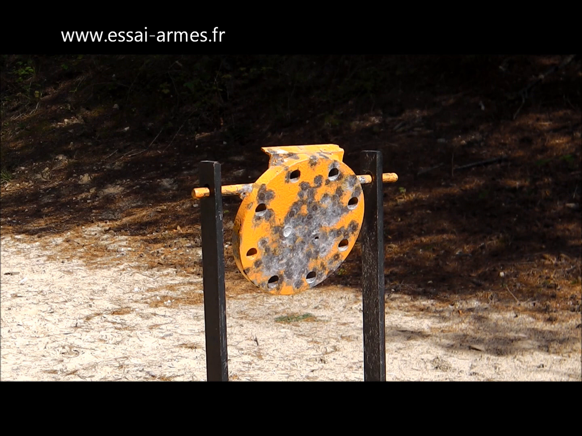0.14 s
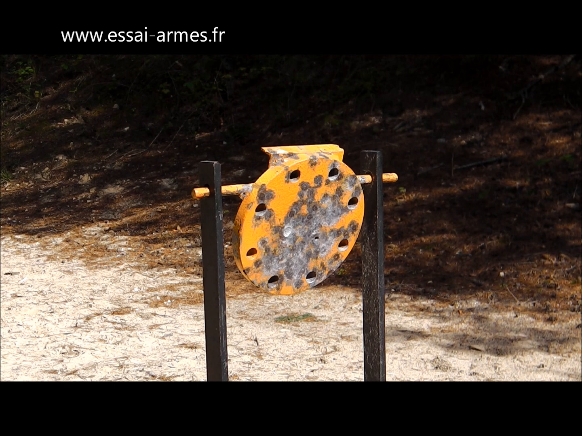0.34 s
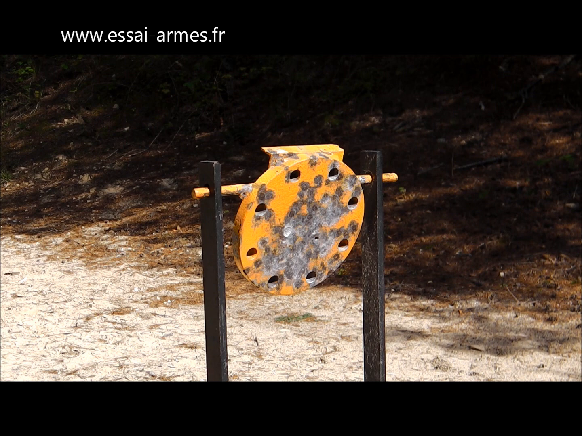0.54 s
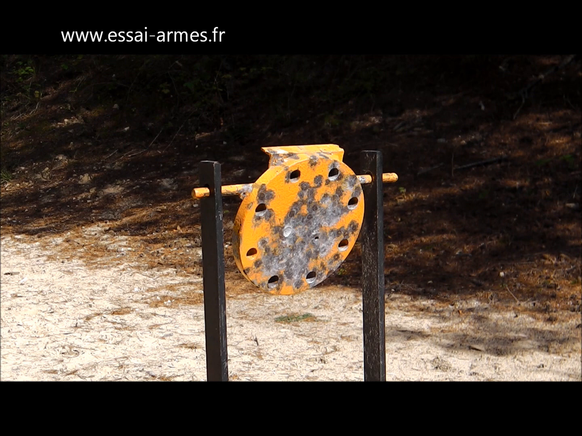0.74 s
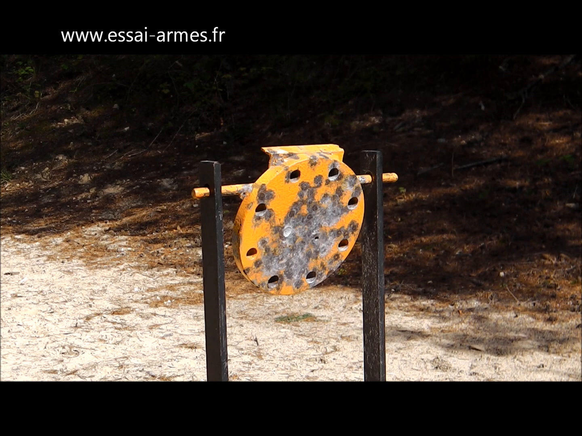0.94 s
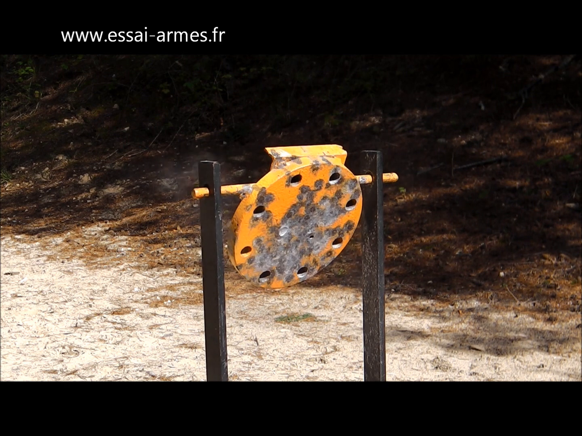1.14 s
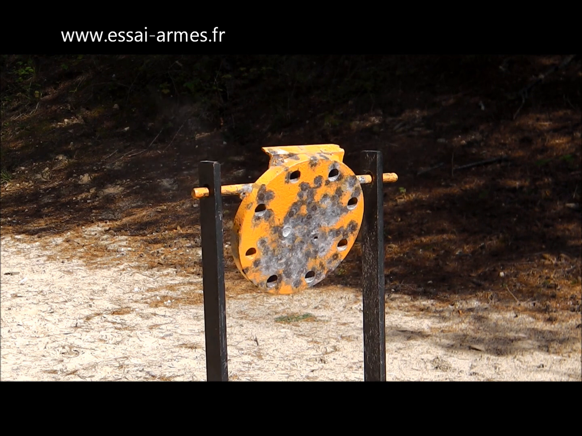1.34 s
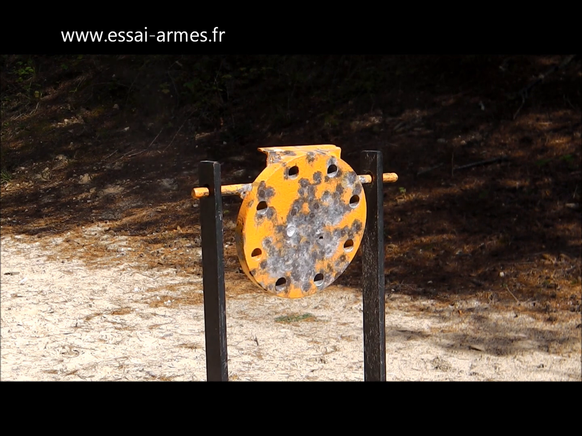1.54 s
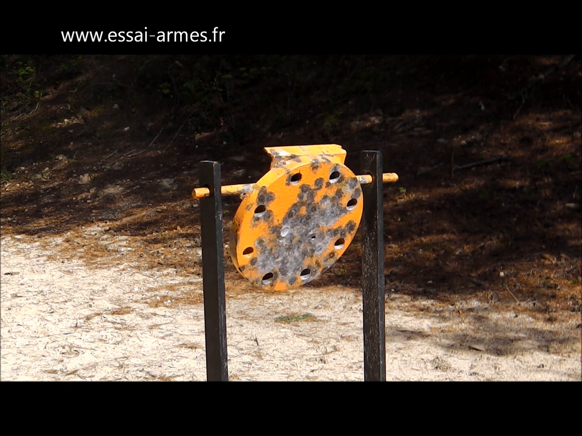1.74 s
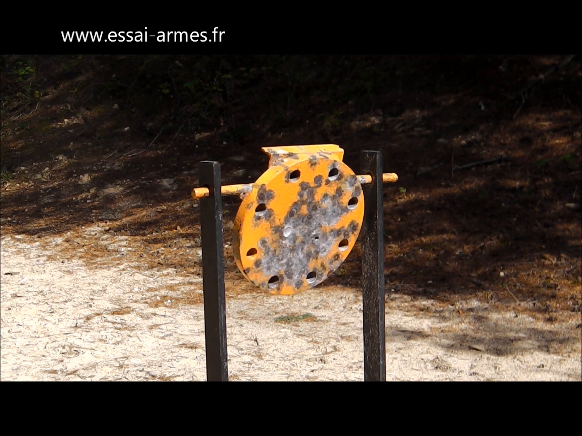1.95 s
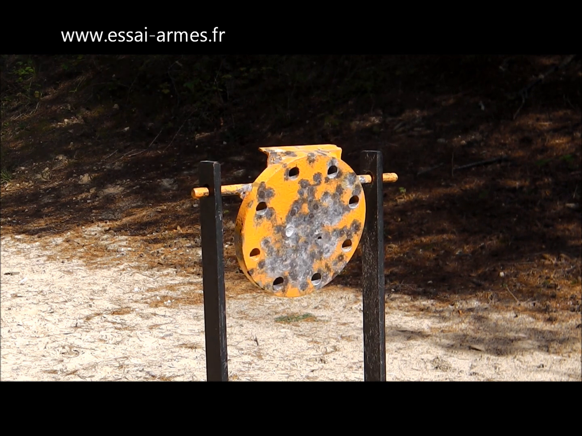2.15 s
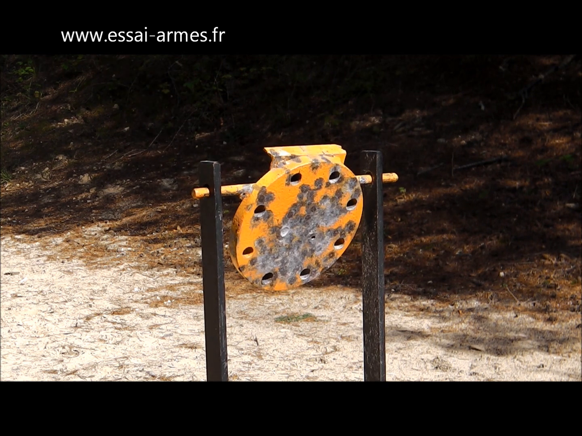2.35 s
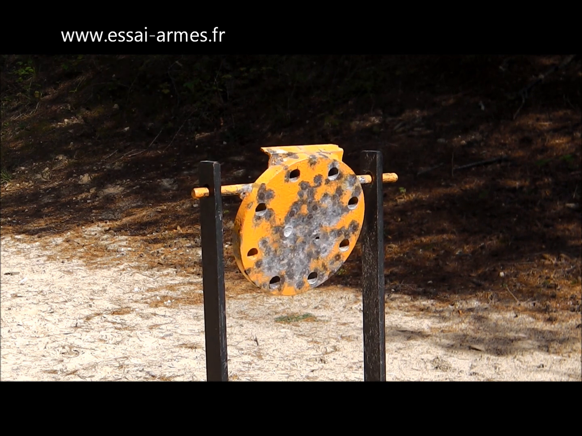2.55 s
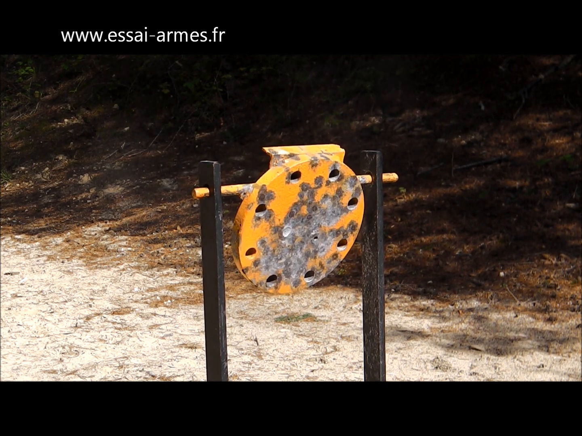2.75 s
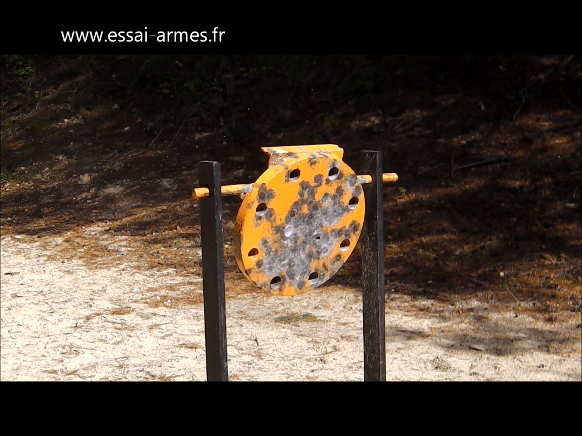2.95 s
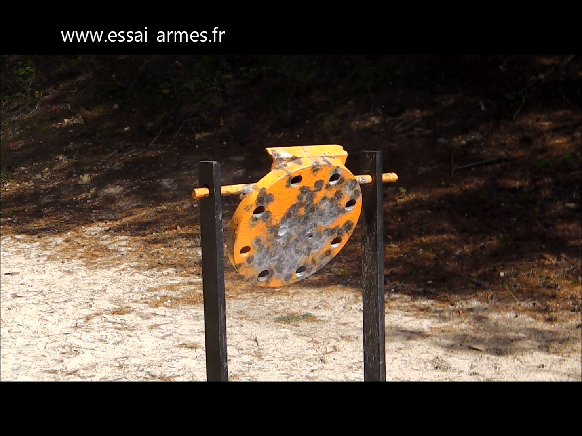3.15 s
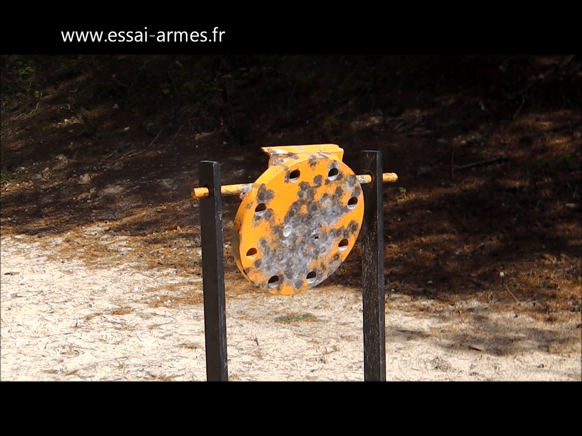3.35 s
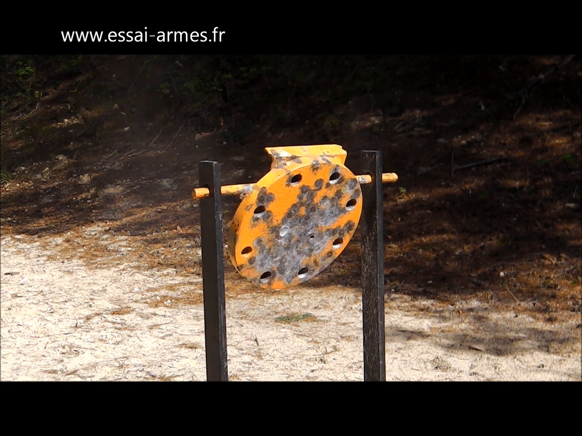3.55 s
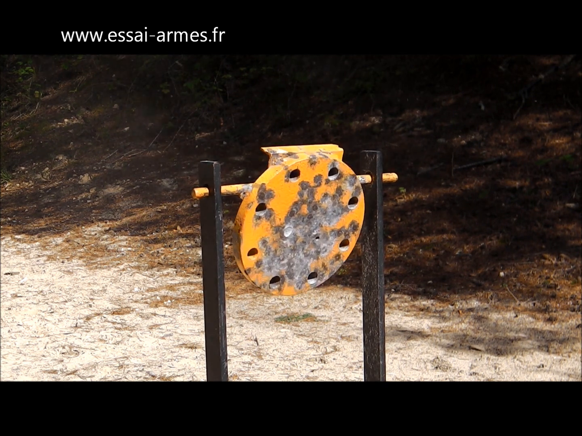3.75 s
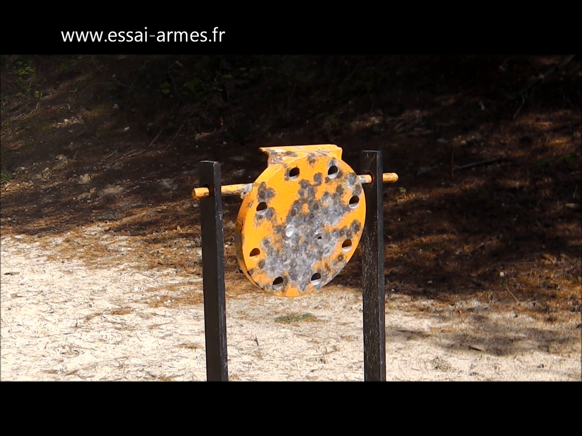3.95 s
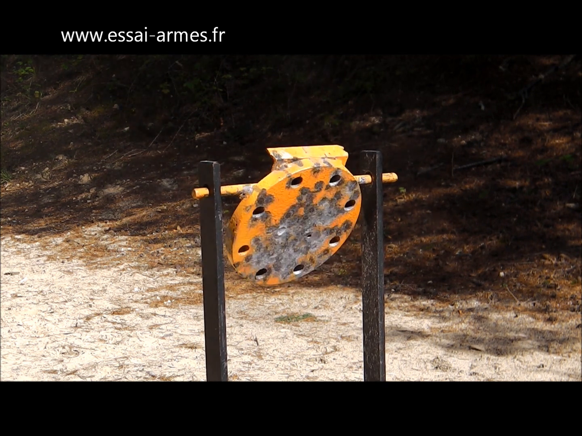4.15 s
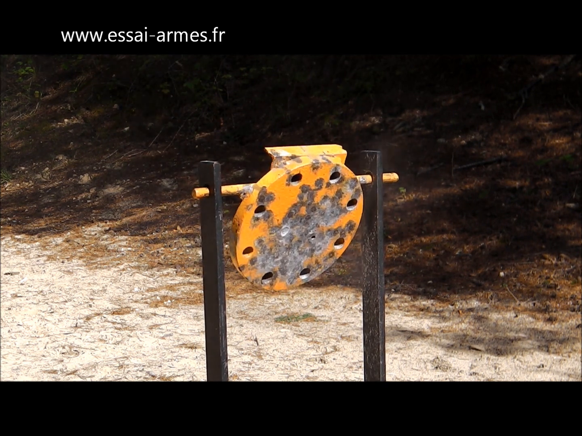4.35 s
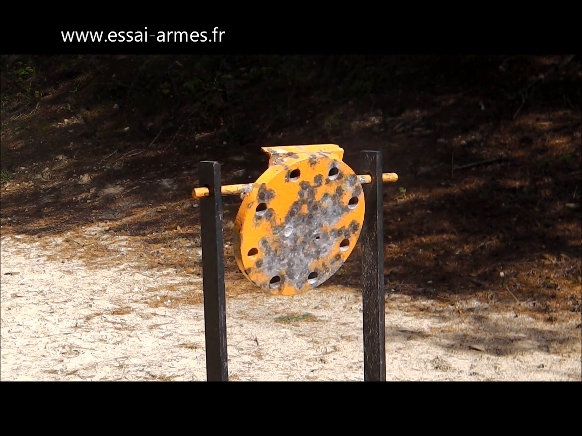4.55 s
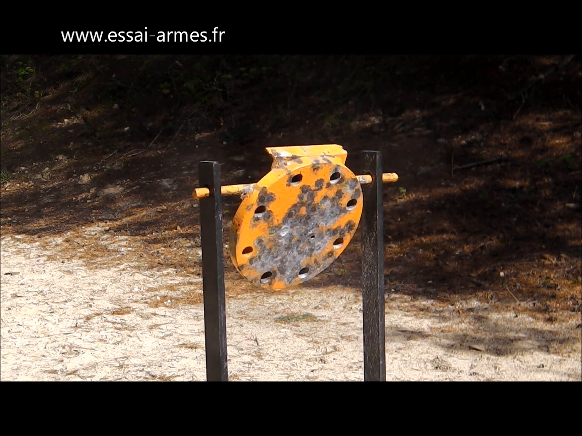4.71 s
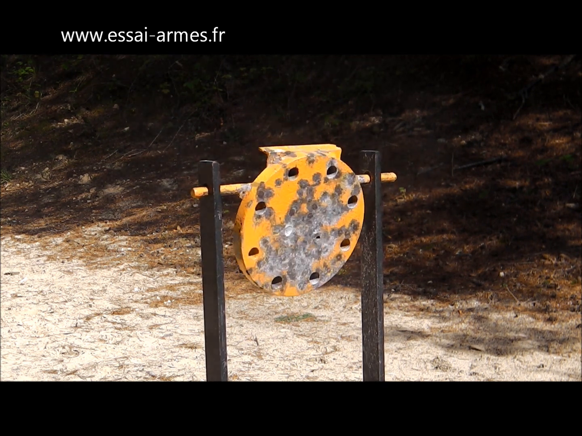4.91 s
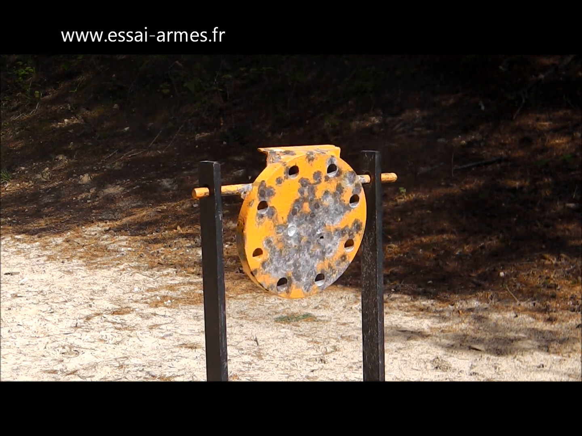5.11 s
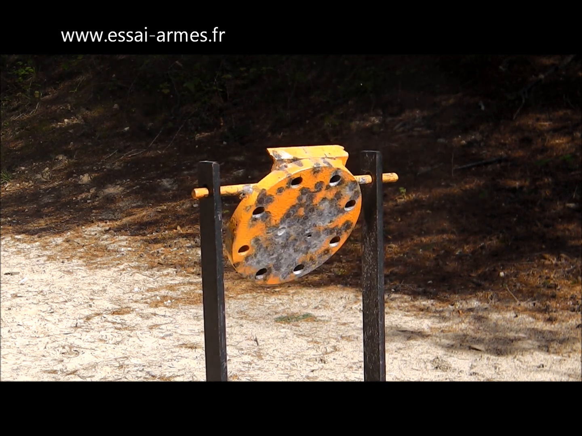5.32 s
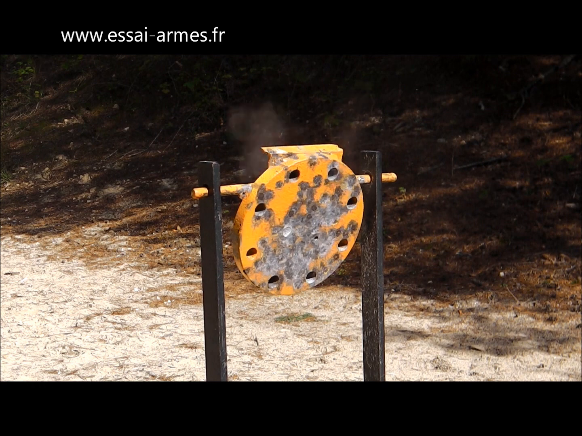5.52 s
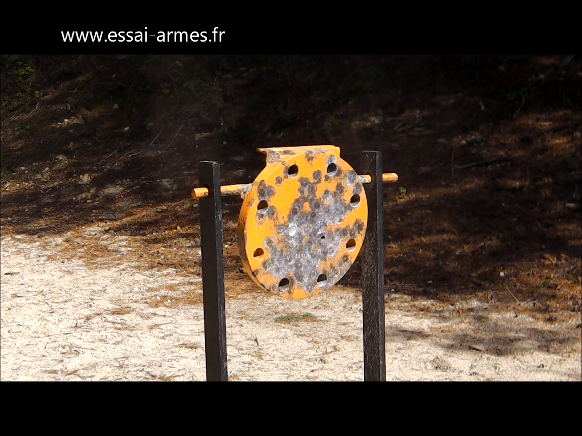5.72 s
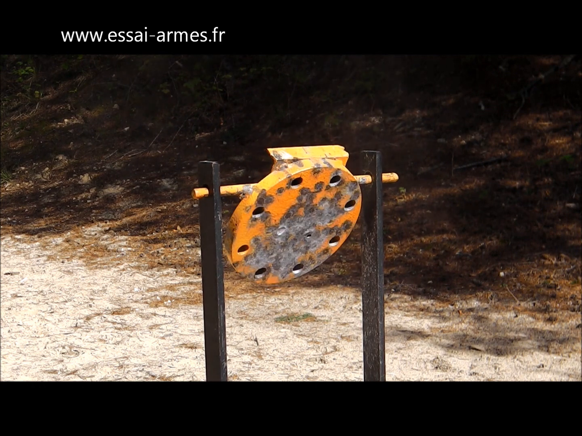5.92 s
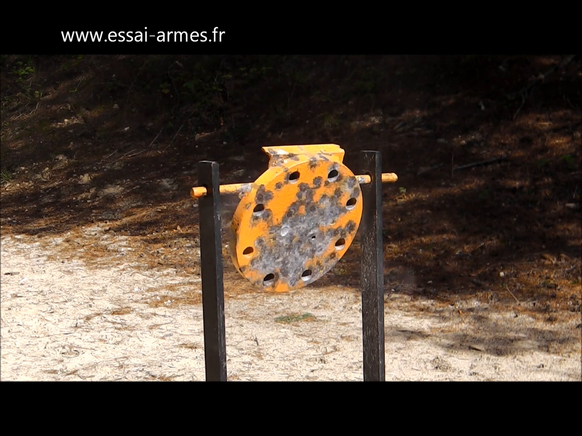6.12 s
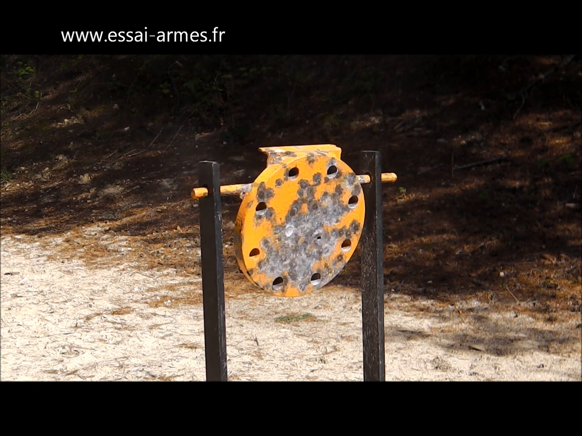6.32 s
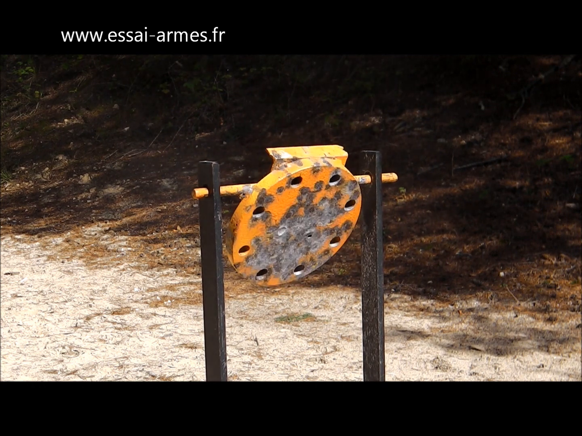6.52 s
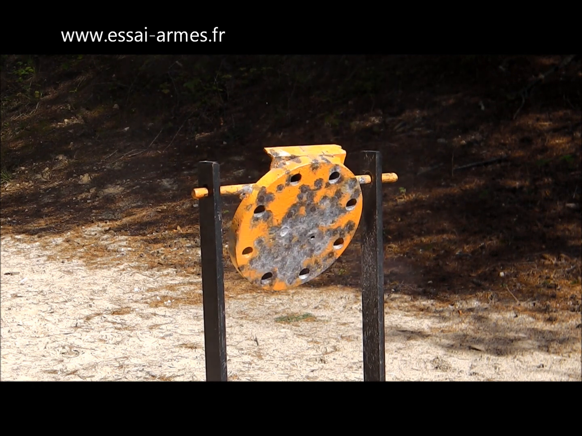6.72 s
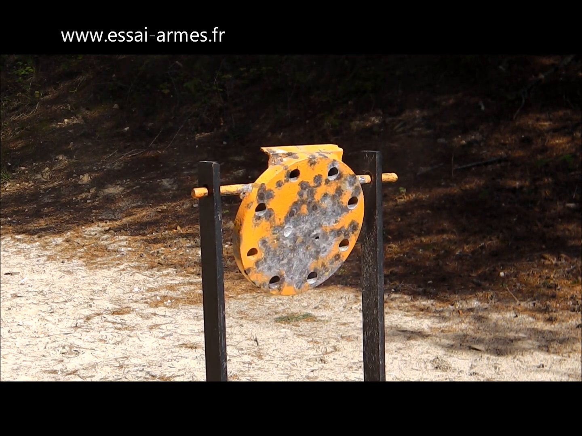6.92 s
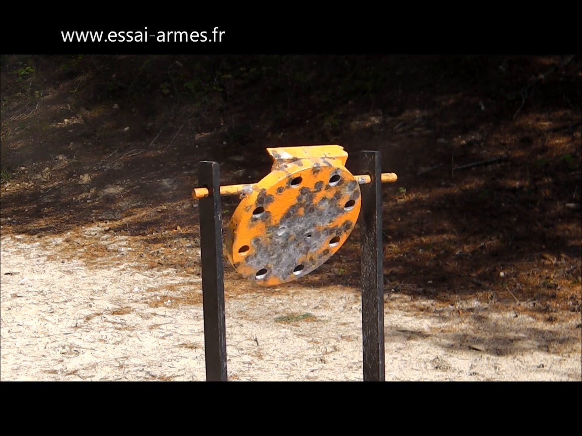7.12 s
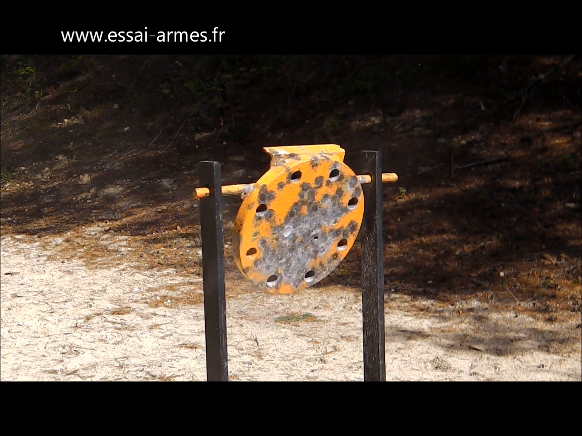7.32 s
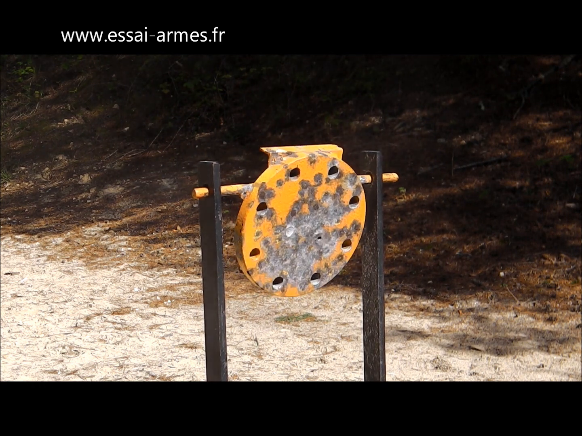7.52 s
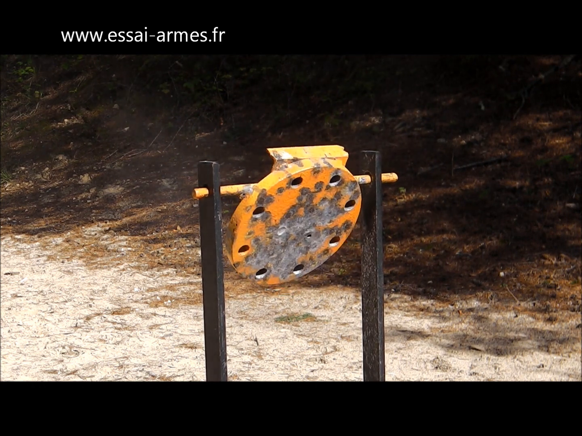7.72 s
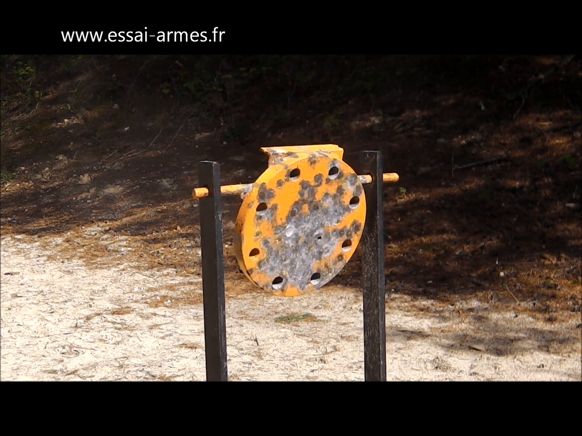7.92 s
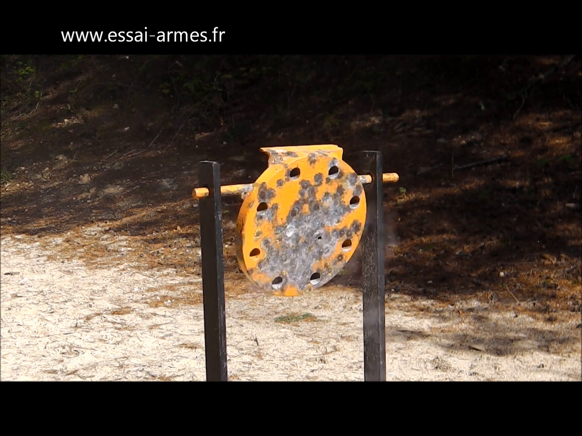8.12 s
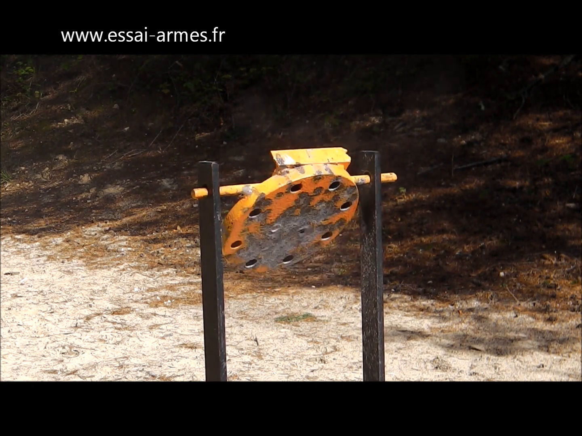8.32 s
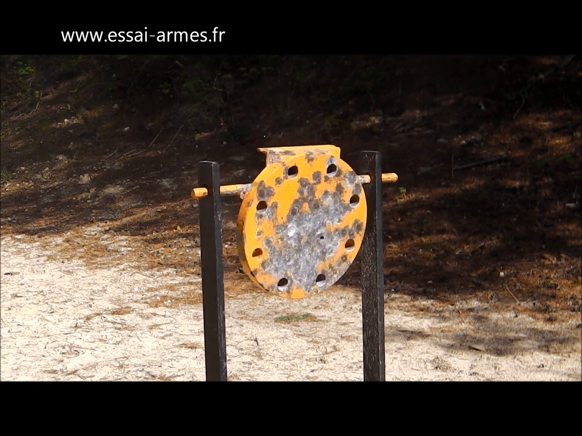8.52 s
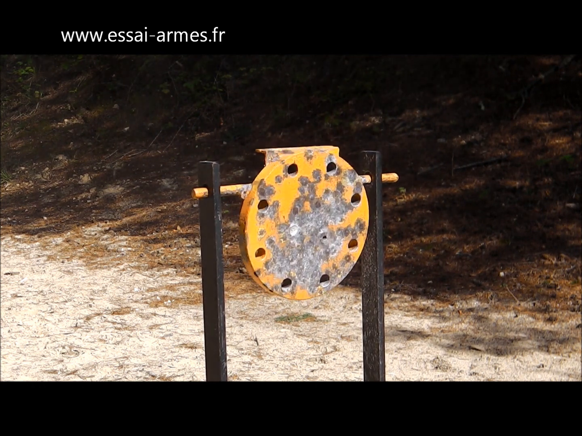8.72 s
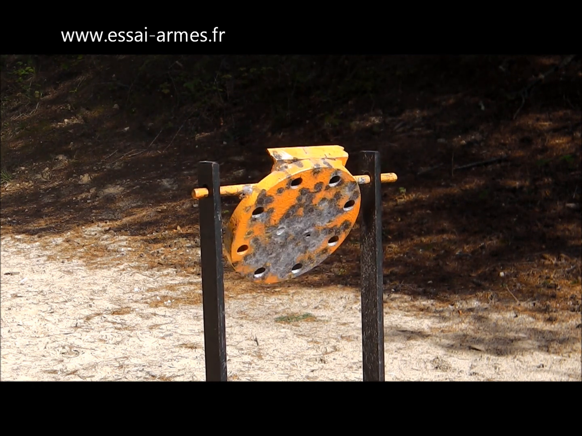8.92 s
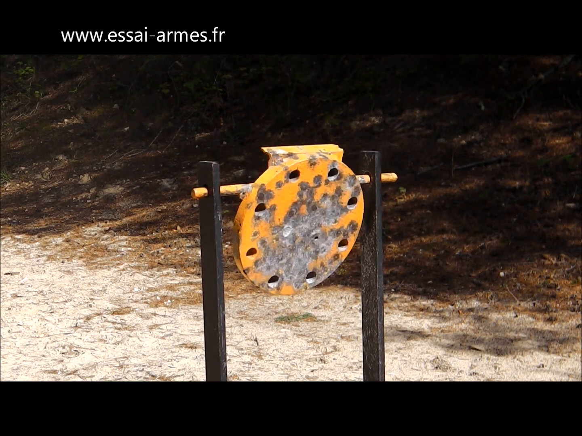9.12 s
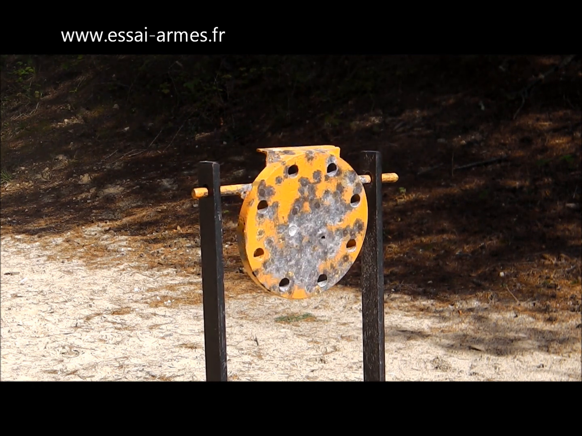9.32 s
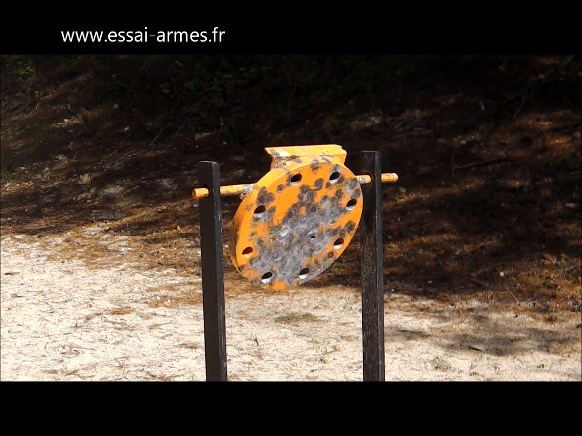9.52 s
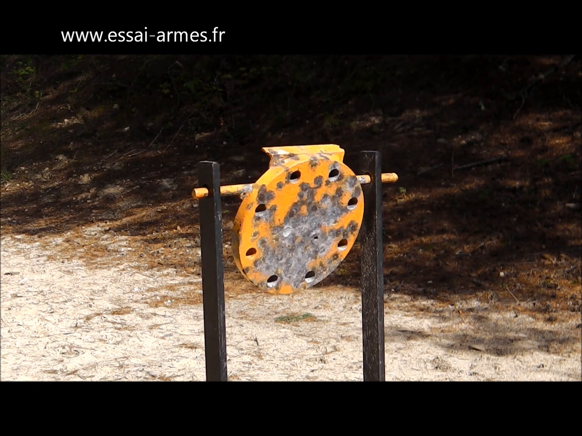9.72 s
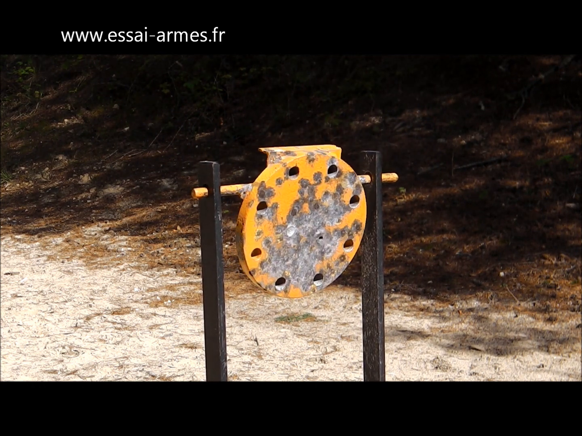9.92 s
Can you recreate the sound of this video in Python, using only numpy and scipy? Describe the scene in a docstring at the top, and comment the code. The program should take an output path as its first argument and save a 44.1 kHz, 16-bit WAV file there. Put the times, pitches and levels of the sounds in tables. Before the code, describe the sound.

For the first 1.2 seconds there is only faint, dull outdoor air and light hiss. Then a small rifle fires twenty-two shots, about 0.4 seconds apart at first, tightening to about 0.3 by 5 seconds, with the last at 8.3. Each is a hard, short crack with a small thump and bright noisy splash, close to the stereo microphone and softly overloaded. A high steel ping blends in, lasting only about a tenth of a second, varying from clear to nearly hidden. A bright slap returns roughly 0.14 seconds later, over dull bank claps and a rolling tree echo that overlaps the next shots. As the last echo fades, a thin, almost pure, very high whistle swells at 8.7 and lingers; a stronger one peaks at 9.4, just after a tiny dry tick. Low breeze rumble rises from about 9.2 seconds to the end.

```python
"""Twenty-two quick rifle shots at a hanging steel gong on an outdoor range, then two thin high whistles.
Each shot: a blast of damped pressure swings and noise, a bright noise splash, a ring of decaying sines,
then a noise slap from far off, under rolling echoes of banks and trees shaped from noise.
After the firing, wavering near-pure tones swell twice, and a dry tick falls just before the second peak.
A breeze, loudest near the end, still air and hiss lie beneath; the input overloads softly."""
import sys
import numpy as np
from scipy import signal
from scipy.fft import rfft, irfft, next_fast_len
from scipy.io import wavfile

SR = 44100
rng = np.random.default_rng(int(sys.argv[2]) if len(sys.argv) > 2 else 0)


def wav_out(sig):
    """Save sig, one row per channel (or a flat mono array), as 16-bit PCM at SR to the path in sys.argv[1]."""
    wavfile.write(sys.argv[1], SR, np.round(np.clip(np.atleast_2d(sig).T, -1, 1) * 32767).astype(np.int16))


N = 439236

# All levels are relative dB.
# shots; the spot hit sets the gong levels:
# start_s, splash_db, spray_db, first_mode_db, second_mode_db, middle_modes_db, slap_db
SHOTS = [(1.2115, -13.5, -26, -34, -56, -40, -28), (1.6162, -12, -16, -57, -59.5, -57.5, -17.5),
         (1.9683, -11.5, -20, -47.5, -48, -56, -20), (2.3964, -13.5, -24, -57, -60, -58, -24),
         (2.735, -10.5, -19.5, -27, -27.5, -48, -22), (3.1755, -11.5, -16, -56, -27, -45, -29),
         (3.5555, -10.5, -29.5, -37, -37.5, -35.5, -21.5), (4.1177, -7.5, -14.5, -53, -25, -48, -26),
         (4.4264, -11, -26, -22.5, -25.5, -29, -22), (4.7396, -10, -24.5, -34.5, -62, -39, -25),
         (5.031, -3, -16, -21, -27, -35, -29), (5.346, -9, -20.5, -40.5, -30, -38, -28),
         (5.633, -15.5, -25.5, -53, -58, -42, -22), (5.9495, -7.5, -18.5, -42.5, -19.5, -41, -27.5),
         (6.2608, -10, -16.5, -35, -26.5, -44, -31), (6.536, -10, -21.5, -50, -25.5, -41, -24),
         (6.8256, -12, -22, -38, -33.5, -38, -23), (7.1192, -8.5, -17.5, -28.5, -54.5, -34, -25.5),
         (7.4004, -11, -29.5, -60, -55, -52.5, -22), (7.6863, -8, -16, -33, -37, -30.5, -26),
         (7.982, -9.5, -21.5, -37, -47, -38.5, -26.5), (8.279, -9, -17.5, -30.5, -27.5, -29, -39)]
# blast pressure swings, three of thump, two of bark: pitch_hz, level_db, t60_s
SWINGS = [(72.4, -9.5, 0.024), (142, -7.5, 0.0097), (404, -7.5, 0.024), (1030, -13, 0.01),
          (1990, 2, 0.0024)]
# the blast and its repeats by ground and near walls: delay_s, thump_db, bark_db
BOUNCES = [(0, 3, 5), (.0016, 0, 3.5), (.0088, -14, -15), (0.0135, -2, -33.5)]
# spectrum of the blast's dull puff: freq_hz, level_db
PUFF = [(40, -23), (90, 2), (170, 4.5), (420, -3), (800, -0.5), (2000, -17.5), (8000, -63.0)]
# spectrum of splash, crack and tick: freq_hz, level_db
SPLASH = [(60, -3.5), (250, -1.5), (400, 0), (900, 1.5), (2500, 4), (5000, 0.5), (7300, 0.5), (9500, 1),
          (11500, 5.5), (13000, -1), (16000, -5)]
# spectrum of the close echoes: freq_hz, level_db
SPRAY = [(60, -16), (280, -4.5), (500, -1.5), (1000, -1.5), (2200, 5), (5000, 0), (7300, 2.5), (9500, 0),
         (11500, 8.5), (13000, -4), (16000, -17)]
# gong modes, lowest first: pitch_hz, level_db, t60_s
STEEL = [(2128, 1, .36), (3594, 1, .28), (4110, -5, .3), (4642, -2, .46), (7295, -3, .24), (8333, -3, .3),
         (11036, 0, .22), (11598, 0, .26), (12071, 1, .24), (13484, -3, .18)]
# top modes follow the two lowest: offset_db, first_mode_db_per_db, second_mode_db_per_db
TOP_MODES = (-8.5, 0.38, 0.4)
# spectrum of the far slap: freq_hz, level_db
SLAP = [(100, -23), (300, 5.5), (500, -2), (2000, 9.5), (7000, 2.5), (11500, 1.5), (16000, -21)]
# banks that throw back a clap: delay_s
BANKS = [.066, .083, .13, .172, .241]
# spectrum of the bank claps: freq_hz, level_db
BANK_CLAP = [(100, -14), (450, -2), (1800, 0), (4000, -8), (10000, -18), (16000, -35)]
# spectrum of the roll: freq_hz, level_db
ROLL = [(30, -20), (80, -10), (160, -12), (280, -13.5), (450, -9), (900, -3.5), (1700, 0), (3500, -3.5),
        (7000, -0.5), (9500, -2.5), (11500, 4.5), (13000, -5.5), (16000, -13.5)]
# decay of the roll: freq_hz, t60_s
ROLL_T60 = [(60, 1.8), (400, 9.2), (1200, 6.2), (2400, 2.93), (3400, 2.1), (5000, 1.53), (8000, 1.156),
            (14000, 0.5)]
# depth of the roll's level changes: freq_hz, depth_ratio
LUMP_DEPTH = [(200, .4), (700, 1), (2500, 1), (7000, .4)]
# whistles: peak_s, level_db, linger_t60_s, pip_lead_s, low_note_lag_s, low_note_db
WHISTLES = [(8.699, -16, 0.49, .042, .16, -55), (9.383, -8.5, 0.33, .068, 0.11, -42)]
# dry ticks: start_s, level_db
TICKS = [(9.368, -24.5)]
# breeze level over time: time_s, level_db
BREEZE = [(0, -82), (8.6, -76), (9.199, -55.5), (9.6, -56.5), (9.96, -62)]
# spectrum of the breeze: freq_hz, level_db
RUMBLE = [(15, -6), (45, -2.5), (90, -8), (250, -18.5), (2000, -75)]
# spectrum of still air among the trees: freq_hz, level_db
AIR = [(25, -16), (60, -8), (150, -7.5), (270, -6.5), (400, -2), (520, -4.5), (650, -7.5), (1400, -12.5),
       (4000, -21), (8000, -35.5)]
# spectrum of the input hiss: freq_hz, level_db
HISS = [(100, -7), (2000, 0), (5000, 1.5), (11300, -0.5), (15500, -6)]
# stereo width of noise: freq_hz, side_minus_mid_db
WIDTH = [(50, -23), (150, -15), (400, -15), (1500, -9), (4000, -2), (12000, 3)]
# microphone response: freq_hz, gain_db
MIC = [(15, -12), (35, 1.5), (65, 1.5), (190, -1), (245, -7.5), (335, -5.5), (372, 1.5), (550, -.5),
       (7650, 3.5), (7900, -2.5), (8100, 4.5), (8330, 7), (8700, -1), (9200, 0)]

THUMP_DB, BARK_DB = -23, -11.5
# crack level at a spray of 0 dB, and its growth with the spray
CRACK_DB, CRACK_DB_PER_SPRAY_DB = -4, 0.72
SPLASH_DELAY_S, SPLASH_RISE_S, SPLASH_HOLD_S, SPLASH_T60_S = 0.0083, 0.0013, 0.0046, .028
RING_RISE_S, RING_HOLD_S, RING_CUT_DB_PER_S = 0.031, 0.066, 210
SLAP_DELAY_S, SLAP_RISE_S, SLAP_RISE_DB_PER_S = .141, .006, 3000
BANK_DB, BANK_LOSS_DB_PER_S = -21.5, 14.5
# hold lasts while the sound crosses the trees; the fall then adds to ROLL_T60
ROLL_DB, ROLL_RISE_S, ROLL_HOLD_S, ROLL_FALL_DB_PER_S = -23, 0.087, 0.74, 30.5
ROLL_DB_PER_SPRAY_DB = 0.29
# early lumps blend into a smooth wash
LUMPS_DB, LUMPS_BLEND_S = 5.5, 0.42
# one broad swell from a far wooded slope
SLOPE_DELAY_S, SLOPE_WIDTH_S, SLOPE_DB = 0.382, 0.051, 1.5
# tone rises and falls below are times per 60 dB
WHISTLE_HZ, WHISTLE_RISE_S, WHISTLE_FALL_S, LINGER_DB = 8343, 0.11, 0.2, -3.5
PIP_HZ, PIP_DB, PIP_RISE_S, PIP_FALL_S = 8960, -16, 0.019, 0.078
LOW_NOTE_HZ, LOW_NOTE_RISE_S, LOW_NOTE_HOLD_S, LOW_NOTE_FALL_S = 5270, 0.078, .055, 0.14
# the low note slides down onto its pitch
SLIDE_HZ, SLIDE_S = 900, 0.0166
AIR_DB, HISS_DB = -52, -52
CEILING, TOP_HZ = 0.77, 16000


def rifle():
    """Every shot excites the gong and the range, whose answer is partly alike, partly new as the air moves."""
    track = np.zeros((2, N))
    steady = amp(ROLL_DB) * roll()
    add(steady, 0, bank_echoes())
    for start_s, splash_db, spray_db, first_db, second_db, middle_db, slap_db in SHOTS:
        crack_db = CRACK_DB + CRACK_DB_PER_SPRAY_DB * spray_db
        add(track, start_s, blast(THUMP_DB, BARK_DB, crack_db))
        add(track, start_s, splash(splash_db, spray_db))
        add(track, start_s, gong(first_db, second_db, middle_db))
        add(track, start_s + SLAP_DELAY_S, far_slap(slap_db))
        fresh = amp(ROLL_DB - 5.5) * roll()
        answer_db = ROLL_DB_PER_SPRAY_DB * (spray_db + 13.5)
        add(track, start_s, amp(answer_db) * (steady + fresh))
    return track


def blast(thump_db, bark_db, crack_db):
    """A steep pressure jump swings out, repeated by ground and walls, with a ragged crack and dull puff."""
    t = clock(.1)
    hz, db, t60_s = np.transpose(SWINGS)[:, :, None, None]
    polarity = (-1) ** np.arange(len(SWINGS))[:, None, None]
    swings = np.zeros((2, len(t)))
    for delay_s, low_db, high_db in BOUNCES:
        # reflections reach the two microphones at slightly different moments
        since = t - delay_s * (1 + 0.056 * rng.standard_normal((2, 1)))
        level_db = np.where(hz < 700, thump_db + low_db + 20.0, bark_db + high_db + 8.5) + db
        level_db = level_db + rng.normal(0, 1.2, hz.shape)
        pitch_hz = hz * rng.normal(1, 0.13, hz.shape)
        wave = np.cos(2 * np.pi * pitch_hz * since) * fade(since, t60_s)
        swings += (polarity * amp(level_db) * wave).sum(axis=0)
    puff = np.clip(t / 0.0017, 0, 1) * fade(t, 0.077) * noise(PUFF, len(t), wide_db=14)
    crack = fade(t, 0.062) * noise(SPLASH, len(t), wide_db=1.5)
    return swings + amp(thump_db + 7) * puff + amp(crack_db + 5.5) * crack


def splash(splash_db, spray_db):
    """A bright noise burst milliseconds behind the blast, and a two-stage decay of close echoes."""
    t = clock(.4)
    since = t - SPLASH_DELAY_S
    decay = fade(np.maximum(since - SPLASH_HOLD_S, 0), SPLASH_T60_S)
    burst = np.clip(since / SPLASH_RISE_S, 0, 1) * decay * noise(SPLASH, len(t), wide_db=-3.5)
    echo_decay = fade(t, 0.13) + amp(-17.0) * fade(t, 0.82)
    spray = np.clip(t / 0.027, 0, 1) * echo_decay * noise(SPRAY, len(t), wide_db=1.5)
    return amp(splash_db + 2.7) * burst + amp(spray_db + 11) * spray


def gong(first_db, second_db, middle_db):
    """Each hit lands elsewhere on the plate and shares its blow differently among decaying modes."""
    t = clock(.3)
    hz, db, t60_s = np.transpose(STEEL)
    top_db = np.dot(TOP_MODES, [1, first_db, second_db]) + rng.normal(0, 2.5, len(hz) - 4)
    blow_db = np.r_[first_db, second_db, middle_db, middle_db, top_db]
    # shared random phase, plus a small offset per channel
    phase = rng.uniform(0, 2 * np.pi, (len(hz), 1)) + rng.normal(0, 0.44, (2, len(hz), 1))
    decay = amp(blow_db + db + 9.5)[:, None] * fade(t, t60_s[:, None])
    modes = decay * np.sin(2 * np.pi * hz[:, None] * t + phase)
    cut = amp(-RING_CUT_DB_PER_S * np.maximum(t - RING_HOLD_S, 0))
    return modes.sum(axis=1) * np.clip(t / RING_RISE_S, 0, 1) * cut


def far_slap(slap_db):
    """A short bright clap returns from down the range, with a little scatter behind it."""
    t = clock(.1)
    since = t - SLAP_RISE_S
    clap = np.minimum(amp(since * SLAP_RISE_DB_PER_S), amp(-60 * since / .04))
    scatter = amp(-13) * fade(since, .12)
    return amp(slap_db + 2.0) * (clap + scatter) * noise(SLAP, len(t), wide_db=-0.5)


def bank_echoes():
    """Banks throw back single dull claps, weaker with delay."""
    t = clock(.04)
    echoes = np.zeros((2, SR // 2))
    for delay_s in BANKS:
        level_db = BANK_DB - BANK_LOSS_DB_PER_S * delay_s
        add(echoes, delay_s, amp(level_db) * fade(t, 0.011) * noise(BANK_CLAP, len(t), wide_db=6.5))
    return echoes


def roll():
    """Scattered sound decays at a rate set per frequency, lumpiest in the middle range."""
    t = clock(2)
    hz, when_s, bins = signal.stft(noise(ROLL, len(t), wide_db=-3.5), SR, nperseg=256)
    lumps_db = LUMPS_DB * np.exp(-t / LUMPS_BLEND_S) * wobble(len(t), 170)
    lumps_db = lumps_db + 1.8 * wobble(len(t), 18)
    depth = along(LUMP_DEPTH, hz)[:, None]
    fall_db = ROLL_FALL_DB_PER_S * np.maximum(when_s - ROLL_HOLD_S, 0)
    slope_db = SLOPE_DB * np.exp(-((when_s - SLOPE_DELAY_S) / SLOPE_WIDTH_S) ** 2)
    level_db = depth * np.interp(when_s, t, lumps_db) - fall_db + slope_db
    decay = fade(when_s, along(ROLL_T60, hz)[:, None])
    bins = bins * amp(level_db) * np.clip(when_s / ROLL_RISE_S, 0, 1) * decay
    return signal.istft(bins, SR, nperseg=256)[1][:, :len(t)]


def whistles():
    """Near-pure tones: a pip, a main note that swells, drops and lingers with a beat, a faint low note."""
    track = np.zeros((2, N))
    lead_s = .2
    t = clock(.9) - lead_s
    size = len(t)
    for peak_s, level_db, linger_t60_s, pip_lead_s, low_lag_s, low_db in WHISTLES:
        pip_level = amp(PIP_DB) * swell(t + pip_lead_s, PIP_RISE_S, PIP_FALL_S)
        pip = pip_level * tone(PIP_HZ, size, waver_hz=60)
        main = swell(t, WHISTLE_RISE_S, WHISTLE_FALL_S) * tone(WHISTLE_HZ, size, waver_hz=25)
        linger_level = amp(LINGER_DB) * fade(t, linger_t60_s) * np.clip(t / 0.063, 0, 1)
        linger = linger_level * tone(WHISTLE_HZ, size, waver_hz=5.7)
        low_hz = LOW_NOTE_HZ + SLIDE_HZ * np.clip((low_lag_s - t) / SLIDE_S, 0, 1)
        # negative before the lag, zero through the hold
        low_t = t - np.clip(t, low_lag_s, low_lag_s + LOW_NOTE_HOLD_S)
        low = swell(low_t, LOW_NOTE_RISE_S, LOW_NOTE_FALL_S) * tone(low_hz, size, waver_hz=25)
        add(track, peak_s - lead_s, amp(level_db) * (pip + main + linger) + amp(low_db) * low)
    # first channel 1 dB louder, second 1 dB softer
    return track * amp([[1], [-1]])


def ticks():
    """A tick is bright noise that dies within milliseconds."""
    track = np.zeros((2, N))
    t = clock(.02)
    for start_s, level_db in TICKS:
        add(track, start_s, amp(level_db + 5.5) * fade(t, 0.0025) * noise(SPLASH, len(t), wide_db=-6.0))
    return track


def breeze():
    """A light breeze on the microphone: low noise with an uneven level."""
    level_db = np.interp(np.arange(N) / SR, *np.transpose(BREEZE)) + 2.5 * wobble(N, 6)
    return amp(level_db) * noise(RUMBLE, N, wide_db=21)


def air():
    """Still air among the trees: steady dull noise."""
    return amp(AIR_DB) * noise(AIR, N, wide_db=14.5)


def noise(spectrum, size, wide_db=0):
    """Coloured stereo noise of rms 1, wider in the treble than in the bass."""
    m = next_fast_len(size + 2048)
    hz = np.fft.rfftfreq(m, 1 / SR)
    bins = rfft(rng.standard_normal((2, m))) * amp(along(spectrum, hz))
    mid = irfft(bins[0], m)
    side = irfft(bins[1] * amp(along(WIDTH, hz) + wide_db), m)
    return unit(np.array([mid + side, mid - side])[:, :size])


def tone(hz, size, waver_hz):
    """A sine whose pitch wavers at random."""
    return np.sin(2 * np.pi * np.cumsum(hz + waver_hz * wobble(size, 70)) / SR)


def swell(t, rise_s, fall_s):
    """Grows 60 dB in rise_s up to t = 0, then loses 60 dB in fall_s."""
    return amp(-60 * np.maximum(-t / rise_s, t / fall_s))


def fade(t, t60_s):
    """Silent before t = 0, then an exponential decay."""
    return (t >= 0) * amp(-60 * np.maximum(t, 0) / t60_s)


def wobble(size, knots_per_s):
    """A random curve, linear between normal random knots."""
    knots = rng.standard_normal(int(size * knots_per_s / SR) + 2)
    return np.interp(np.arange(size) * knots_per_s / SR, np.arange(len(knots)), knots)


def along(points, hz):
    """(freq_hz, value) points read on a log frequency axis."""
    f, v = np.transpose(points)
    return np.interp(np.log(hz + 1), np.log(f + 1), v)


def amp(db):
    """Decibels to amplitude ratio."""
    return 10 ** (np.asarray(db) / 20)


def unit(x):
    """Scale to rms 1."""
    return x / np.sqrt(np.mean(x ** 2) + 1e-20)


def clock(length_s):
    """Sample times in seconds."""
    return np.arange(int(length_s * SR)) / SR


def add(track, start_s, sound):
    """Mix a sound into the track, cut at its end."""
    part = track[:, round(start_s * SR):][:, :sound.shape[-1]]
    part += sound[..., :part.shape[1]]


def scene():
    """Shots, whistles and tick over a quiet outdoor background."""
    return rifle() + whistles() + ticks() + breeze() + air()


def record(dry):
    """The microphone colours the sound, the input hisses and overloads softly, the band ends steeply."""
    m = next_fast_len(N + SR // 2)
    hz = np.fft.rfftfreq(m, 1 / SR)
    coloured = irfft(rfft(dry, m) * amp(along(MIC, hz)), m)[:, :N]
    heard = coloured + amp(HISS_DB) * noise(HISS, N, wide_db=0)
    # soft clipping at twice the rate, against aliasing
    fine = signal.resample_poly(heard, 2, 1, axis=1)
    clipped = fine / (1 + np.abs(fine / CEILING) ** 4) ** (1 / 4)
    limited = signal.resample_poly(clipped, 1, 2, axis=1)
    return irfft(rfft(limited, m) * (hz < TOP_HZ), m)[:, :N]


dry = scene()
out = record(dry)
wav_out(out)
```